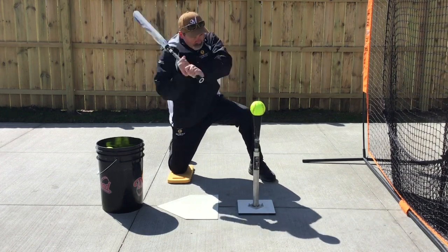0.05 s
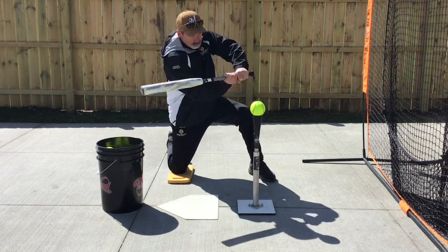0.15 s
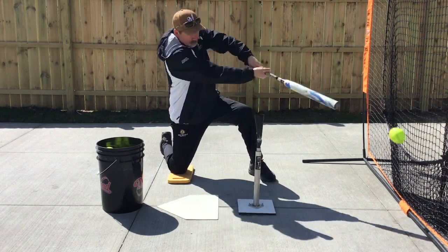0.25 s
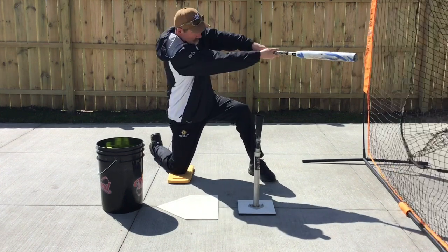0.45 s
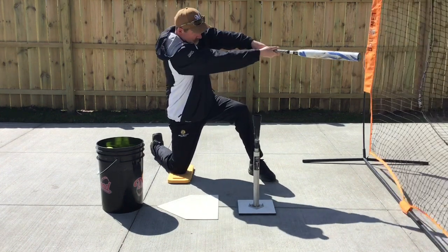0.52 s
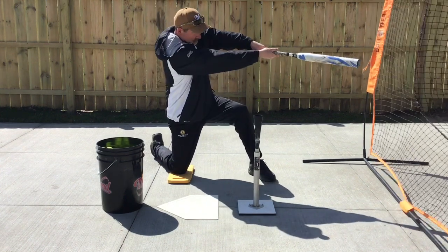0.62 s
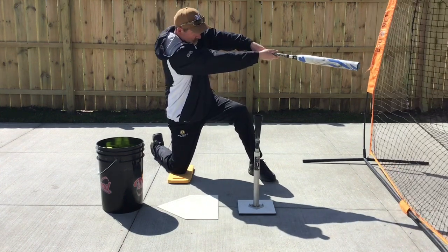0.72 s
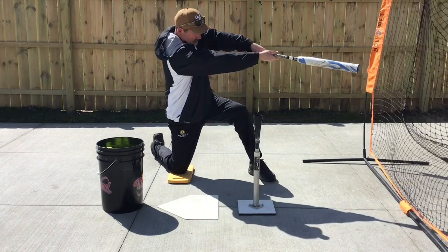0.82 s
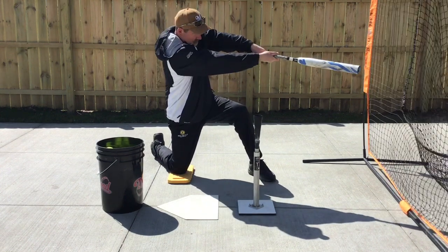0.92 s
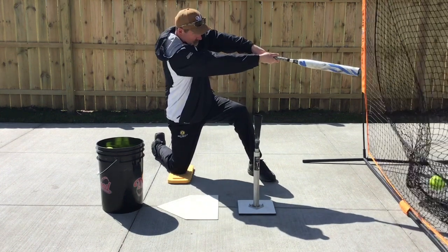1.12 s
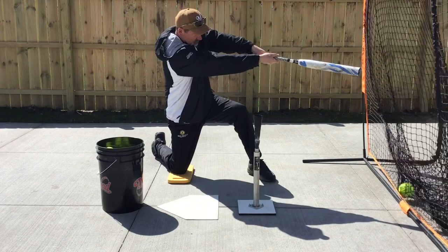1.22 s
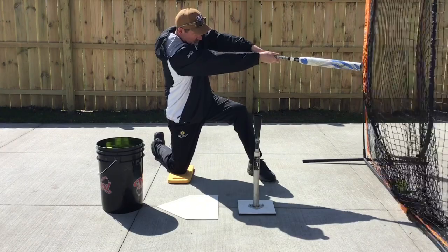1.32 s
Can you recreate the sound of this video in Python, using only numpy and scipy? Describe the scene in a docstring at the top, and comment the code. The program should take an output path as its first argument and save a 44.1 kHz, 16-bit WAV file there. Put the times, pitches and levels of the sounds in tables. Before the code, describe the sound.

A bat swishes faintly and hits a softball with a sharp, loud crack at about 0.25 seconds, echoing briefly around a yard. A practice net's frame rattles faintly from 0.6 to 0.9 seconds. The ball drops with a dull knock at 1 second, then bounces softly with another rattle near 1.3. Light wind rumbles underneath, and a distant bird chirps very faintly from about 0.9 seconds.

```python
"""Light wind rumbles over a fenced, paved yard. A composite bat swishes and cracks a softball off a tee;
ground, fence and houses throw the crack back. The practice net catches the ball and its frame rattles.
A small bird starts to chirp far away. The ball drops with a dull knock and bounces against the frame,
which rattles again."""
import sys
import numpy as np
from scipy import signal
from scipy.fft import rfft, irfft, next_fast_len
from scipy.io import wavfile
from scipy.ndimage import uniform_filter1d

SR = 44100
rng = np.random.default_rng(int(sys.argv[2]) if len(sys.argv) > 2 else 0)


def put_to_file(sound):
    """Save the sound as 16-bit audio at rate SR, in the file named by the first command-line argument."""
    columns = np.atleast_2d(sound).T  # one column per channel
    safe = np.clip(columns, -1, 1)
    whole_steps = np.round(safe * 32767)
    wavfile.write(sys.argv[1], SR, whole_steps.astype(np.int16))


N = 59535
HIT_S = .2410  # when the bat meets the ball


def amp(db):
    """Turns decibels into a multiplier."""
    return 10 ** (np.asarray(db) / 20)


def evened(x):
    """Scales a signal to an average (rms) level of 1."""
    return x / np.sqrt(np.mean(x ** 2) + 1e-20)


def unit(x):
    """Scales a signal to a total energy of 1."""
    return x / np.linalg.norm(x)


def read(points, hz):
    """Looks up values between a table's rows, on a log-frequency axis."""
    row_hz, value = np.transpose(points)
    return np.interp(np.log(hz + 1), np.log(row_hz + 1), value)


def since(s):
    """Seconds since time s, zero before it."""
    return np.maximum(np.arange(N) / SR - s, 0)


def dying(t, t60):
    """A fade. The fade time, t60, is how many seconds it takes to drop 60 dB."""
    return np.exp(-np.log(1000) * t / t60)


def delayed(x, s):
    """Starts a sound at time s."""
    return np.pad(x, (round(s * SR), 0))[:N]


def noise(colour):
    """Steady noise. Its colour says how strong each frequency is compared with the others."""
    gain = amp(read(colour, np.fft.rfftfreq(N, 1 / SR)))
    return evened(irfft(rfft(rng.standard_normal(N)) * gain, N))


def wobble(samples):
    """A random wiggle, smoothed over this many samples."""
    return evened(uniform_filter1d(rng.standard_normal(N), samples))


def pulse(colour, size=4096):
    """A click of the given colour, with its energy packed at the start."""
    log_gain = np.log(amp(read(colour, abs(np.fft.fftfreq(size, 1 / SR)))))
    spectrum = np.exp(np.conj(signal.hilbert(log_gain)))
    return unit(np.pad(np.fft.ifft(spectrum).real, (0, N - size)))


def ring(notes, s=0):
    """The fading notes of an object struck at time s."""
    t = since(s)
    return sum(amp(db) * dying(t, t60) * np.sin(2 * np.pi * hz * t) for hz, db, t60 in notes)


def travel(x, s, paths):
    """Sends a sound made at time s along paths that delay and dull it."""
    size = next_fast_len(2 * N)
    f = np.fft.rfftfreq(size, 1 / SR)
    response = sum(amp(db) * np.exp(-2j * np.pi * f * (s + delay)) / (1 + 1j * f / dull_hz)
                   for delay, db, dull_hz in paths)
    return irfft(rfft(x, size) * response, size)[:N]


def scatter(x, t60):
    """Smears a sound as a rough surface does."""
    return signal.fftconvolve(x, unit(rng.standard_normal(N) * dying(since(0), t60)))[:N]


def air():
    """Outdoor hush, and a low rumble that swells with the wind."""
    # Colours of hush and rumble. Each row: frequency in Hz, level in dB.
    hush = [(40, -7.5), (110, -1.5), (200, -2), (300, -5.5), (450, -10.5), (700, -10), (1000, -15.5),
            (1500, -22.5), (2000, -25.5), (2700, -31), (3500, -32), (5000, -34.5), (6500, -45),
            (16000, -46)]
    rumble = [(25, -31), (45, -8), (62, 1.5), (85, 1), (130, -8), (200, -8.5), (300, -27.5), (700, -51),
              (16000, -85.5)]
    # The wind's rise and fall. Each row: time in seconds, relative level in dB.
    wind = [(0.0, -52), (0.096, -55.5), (0.138, -47.5), (0.22, -59.5), (0.506, -51.5), (0.59, -64.5),
            (0.608, -57), (0.906, -50.5), (0.97, -56.5), (1.04, -49), (1.108, -61), (1.292, -58.5),
            (1.312, -83), (1.35, -57.5)]
    gust_db = wobble(round(0.022 * SR))
    wind_db = np.interp(since(0), *np.transpose(wind))
    return amp(-59.5) * noise(hush) + amp(2 + wind_db + gust_db) * noise(rumble)


def swing():
    """Bat and jacket swish up to the hit and settle in the follow-through."""
    # Colour of the swish. Each row: frequency in Hz, level in dB.
    swish = [(100, -1), (600, 5), (1500, -1.5), (4000, -7), (8000, -11.5), (16000, -19)]
    rise_s, fall_s = .08, 0.32
    t = np.arange(N) / SR - HIT_S
    return amp(-59.5) * noise(swish) * np.exp(np.minimum(t / rise_s, -t / fall_s))


def flex(x, hz=1800):
    """The barrel's wall holds back sound near one pitch, drawing a click out into a few vibrations."""
    _, feedback = signal.iirpeak(hz, Q=1.3, fs=SR)
    return signal.lfilter(feedback[::-1], feedback, x)


def bat():
    """The barrel snaps and rings, the ball squashes with a low thock, and the yard throws both back."""
    # Colours of the contact, the barrel's crowded high notes and the slap off the fence behind the
    # batter. Each row: frequency in Hz, level in dB.
    snap_colour = [(70, -43), (130, -21), (230, -7.5), (400, -9.5), (650, -4), (1250, -9.5), (1700, 3.5),
                   (2700, 0.5), (3350, -2.5), (4200, -3), (5600, -5), (6500, -14.5), (7800, -18),
                   (8500, -13), (10500, -18.5), (12000, -27), (12800, -18), (16000, -24.5)]
    crunch_colour = [(100, -35), (700, -12.5), (1500, -7.5), (2500, 6), (3400, -5), (4800, 4), (7500, -10),
                     (10000, -14.5), (16000, -16)]
    fence_colour = [(100, -17), (300, 7.5), (600, -8), (1300, 1), (1850, 8), (2500, 1.5), (4000, 2),
                    (6500, -3.5), (10000, 6), (16000, -1)]
    # Notes of barrel and ball. Each row: pitch in Hz, relative level in dB, fade time in seconds.
    barrel_notes = [(1125, -38.5, 0.037), (1696, -46.5, 0.12), (1556, -38, 0.055), (1809, -23, 0.029),
                    (2420, -41.5, 0.015), (2374, -36.5, 0.013), (2596, -35.5, .035), (2920, -27.5, .035),
                    (3054, -27.5, .035), (3830, -32, 0.037), (4270, -34.5, 0.01), (4200, -33.5, 0.046),
                    (4400, -37, 0.0069), (8420, -39, 0.023)]
    thock_notes = [(311, -27.5, 0.018), (639, -15, 0.021), (794, -18.5, 0.026), (861, -28.5, 0.037)]
    # Routes to the listener. Each row: delay in seconds, level in dB, frequency in Hz where dulling starts.
    crack_paths = [(0, -2.5, 14000), (.0015, 0.5, 5556)]  # direct and off the ground
    thock_paths = [(0, 0.5, 8000), (0.0099, -6, 446)]  # direct and off the fence
    echo_paths = [(0.0223, -18, 3533), (.0275, -13, 1930), (.0485, -32, 2930), (.055, -11, 1000),
                  (.0715, -16, 7100), (.089, -16.5, 1500), (.134, -24, 2980), (.150, -24, 4250),
                  (.215, -37.5, 9000)]  # off boards and walls
    crack = flex(amp(4.5) * pulse(snap_colour) + ring(barrel_notes))
    crunch = amp(-1) * unit(noise(crunch_colour) * dying(since(0), t60=0.044))
    bass_cut = signal.butter(2, 250, "highpass", fs=SR, output="sos")  # a slim bat gives off little bass
    crack, thock = signal.sosfilt(bass_cut, [crack, ring(thock_notes, s=.0015)])
    near = travel(crack + crunch, HIT_S, crack_paths) + travel(thock, HIT_S, thock_paths)
    slap = amp(-4) * signal.fftconvolve(crack, pulse(fence_colour))[:N]
    slap = delayed(slap + amp(0.5) * scatter(slap, t60=.009), HIT_S + .0104)
    hit = crack + thock
    echoes = sum(travel(scatter(hit, t60=0.0065), HIT_S, [path]) for path in echo_paths)
    lasting_note = ring([(1812, -45, .6)], HIT_S)  # the barrel rings on
    return near + slap + echoes + yard(delayed(hit, HIT_S)) + lasting_note


def yard(x):
    """Sound scatters quickly off things nearby, then lingers between fences and houses."""
    # Colour of the yard's blurred echo. Each row: frequency in Hz, level in dB.
    colour = [(100, -9.5), (300, 4), (700, -1.5), (1500, 8), (2100, -3.5), (3000, -1), (6000, 0),
              (10000, -1.5), (16000, -6)]
    # How long it lingers. Each row: frequency in Hz, fade time in seconds.
    fade_times = [(100, 1), (600, .55), (1800, 0.62), (4000, 0.51), (8000, 0.53), (16000, .44)]
    hz, t, bands = signal.stft(noise(colour), SR, nperseg=256)
    fades = dying(t, read(fade_times, hz)[:, None])
    far = signal.istft(bands * fades, SR, nperseg=256)[1][:N]
    near = noise(colour) * dying(since(0), t60=0.088)
    echo = delayed(amp(-12) * unit(far) + amp(-10) * unit(near), s=.014)
    return signal.fftconvolve(x, echo)[:N]


def net_frame():
    """At each knock on the frame, loose joints rattle, metal fittings jingle and the poles ring."""
    # Each row: start in seconds, then the relative levels of rattle, jingle and poles in dB.
    knocks = [(.634, -51.5, -59.5, -86), (.695, -56.5, -83, -57), (0.834, -58, -101, -88),
              (1.283, -49, -62.5, -42), (1.326, -49.5, -81, -52)]
    # Colours of joints and fittings. Each row: frequency in Hz, level in dB.
    rattle_colour = [(200, 1.5), (700, 5), (1100, 2.5), (1600, 8.5), (2100, 1), (2700, 3.5), (3500, -21.5),
                     (4100, -5.5), (5000, -24), (16000, -42)]
    jingle_colour = [(2000, -35), (6700, -16), (7450, 1), (8300, 0), (10500, -12.5), (12000, -17),
                     (16000, -16)]
    # Ringing parts. Each row: pitch in Hz, relative level in dB, fade time in seconds.
    fitting_notes = [(4065, -1, 0.27), (5720, -11, .18), (7090, -5, 0.39), (7545, 0, 0.25),
                     (7800, -16, .18), (8215, 0, 0.18), (9400, -0.5, 0.15), (9800, -20, .15)]
    pole_notes = [(265.9, 6.5, 0.054), (572.5, -1, 0.2), (2620, -10, 0.12), (4059, -20, 0.056)]
    rise_s = 0.0051
    out = np.zeros(N)
    for s, rattle_db, jingle_db, pole_db in knocks:
        t = since(s)
        rattle = amp(rattle_db) * noise(rattle_colour) * dying(t, t60=0.22)
        fizz = noise(jingle_colour) * dying(t, t60=0.23)
        jingle = amp(jingle_db) * (fizz + amp(-5.5) * ring(fitting_notes, s))
        poles = amp(pole_db) * ring(pole_notes, s)
        out += np.minimum(t / rise_s, 1) * (rattle + jingle + poles)
    return out


def bird():
    """Faint, wavering chirps slide in pitch and are blurred by distance."""
    # Each row: start and length in seconds, first and last pitch in Hz, relative level in dB.
    chirps = [(.86, 0.051, 5100, 4690, -75), (0.861, 0.083, 4680, 4080, -78),
              (0.928, 0.063, 5370, 4370, -72), (0.943, 0.072, 3660, 3280, -69),
              (1.122, 0.0184, 4370, 5000, -65.5), (1.199, 0.013, 4990, 5100, -62.5),
              (1.2, 0.024, 2600, 2435, -68.5)]
    out = np.zeros(N)
    for s, length, start_hz, end_hz, db in chirps:
        progress = np.minimum(since(s) / length, 1)
        waver = 1 + 0.0195 * wobble(samples=60)
        hz = (start_hz + (end_hz - start_hz) * progress) * waver
        flicker = 1 + 0.67 * wobble(samples=300)
        tone = np.sin(2 * np.pi * np.cumsum(hz) / SR)
        out += amp(db) * flicker * np.sin(np.pi * progress) * tone
    return scatter(out, t60=0.09)


def ball():
    """Each landing is a gritty tick and a soft, slightly hollow thud."""
    # Each row: start in seconds, then the relative levels of thud and tick in dB.
    bounces = [(1.0228, -6.5, -21), (1.2898, -24.5, -31.5)]
    # Colours of the landing. Each row: frequency in Hz, level in dB.
    tick_colour = [(200, -20), (1800, -22.5), (2700, 12.5), (3800, -2.5), (7000, -7.5), (10500, -1),
                   (16000, -17)]
    thud_colour = [(40, -13), (100, -4), (220, 3), (420, -8), (700, -3), (1100, -13), (1700, -36),
                   (4000, -37.5), (16000, -40)]
    # Its hollow ring. Each row: pitch in Hz, relative level in dB, fade time in seconds.
    hollow_notes = [(180.6, -40, 0.03), (250, -46, 0.061), (521, -37.5, 0.1), (720, -40, 0.092),
                    (900, -42.5, 0.1), (2830, -58, 0.16)]
    # Its routes. Each row: delay in seconds, level in dB, frequency in Hz where dulling starts.
    paths = [(0, -1, 11900), (.0045, -9.5, 12400), (.011, -10, 2000), (.017, -13, 1480), (.0205, -10, 8000),
             (0.056, -16.5, 990)]
    tick_lead_s = 0.0014
    thud = pulse(thud_colour) + ring(hollow_notes)
    out = np.zeros(N)
    for s, thud_db, tick_db in bounces:
        out += delayed(amp(tick_db) * pulse(tick_colour), s - tick_lead_s)
        out += delayed(amp(thud_db) * thud, s)
    return travel(out, 0, paths) + amp(-5) * yard(out)


def scene():
    """All the sounds meet at one microphone."""
    return (air() + swing() + bat() + net_frame() + bird() + ball())[None]


def record(dry):
    """The microphone drops the deepest bass and the recorder drops the highest treble."""
    low_hz, high_hz = 52, 16300
    bass_cut = signal.butter(5, low_hz, "highpass", fs=SR, output="sos")
    treble_cut = signal.firwin(255, high_hz, window=("kaiser", 9), fs=SR)
    return signal.oaconvolve(signal.sosfilt(bass_cut, dry), treble_cut[None], "same")


dry = scene()
out = record(dry)
put_to_file(out)
```